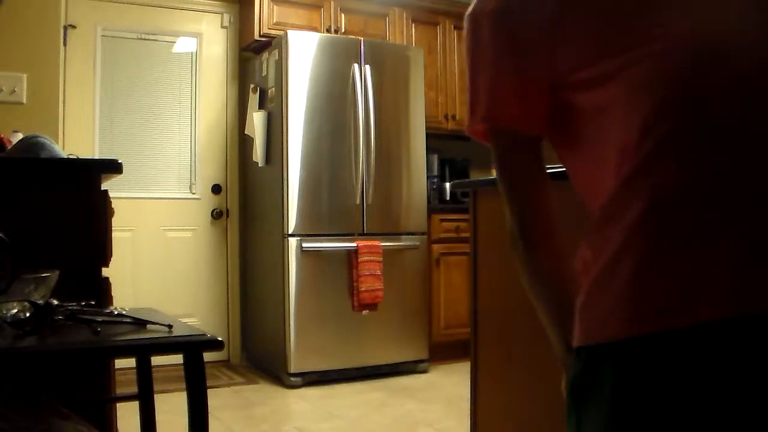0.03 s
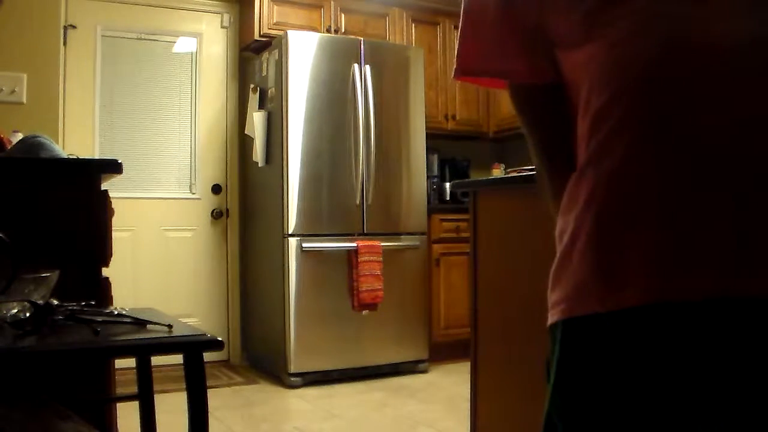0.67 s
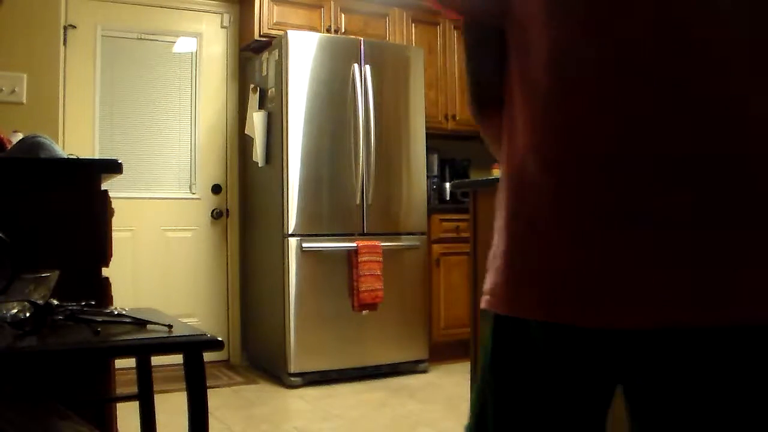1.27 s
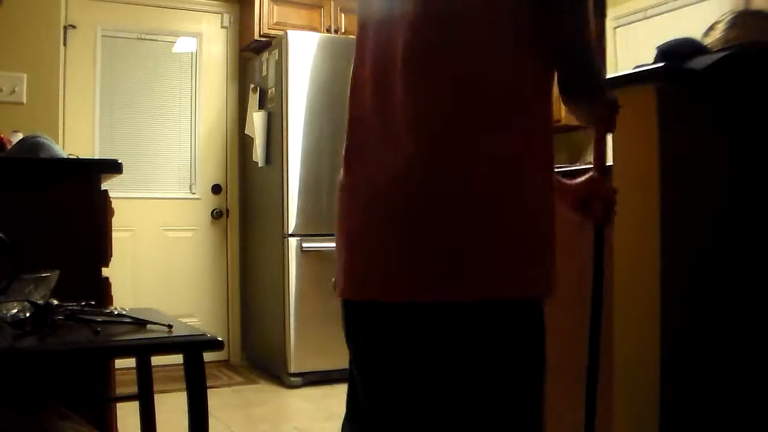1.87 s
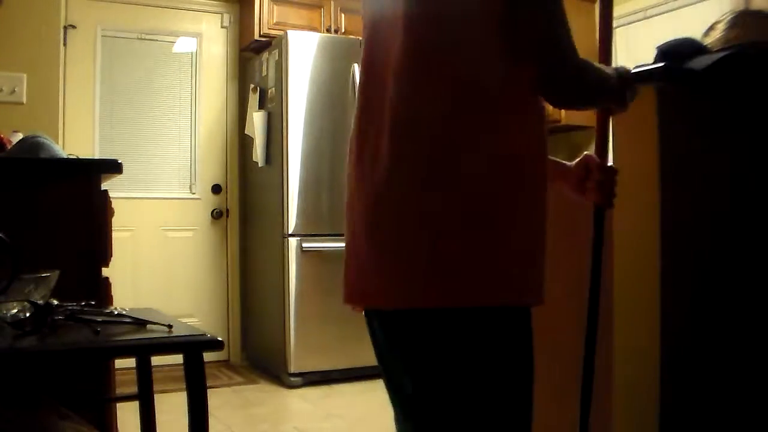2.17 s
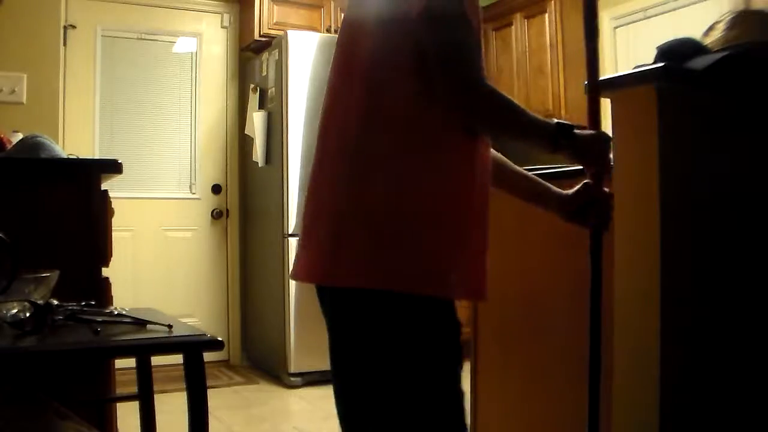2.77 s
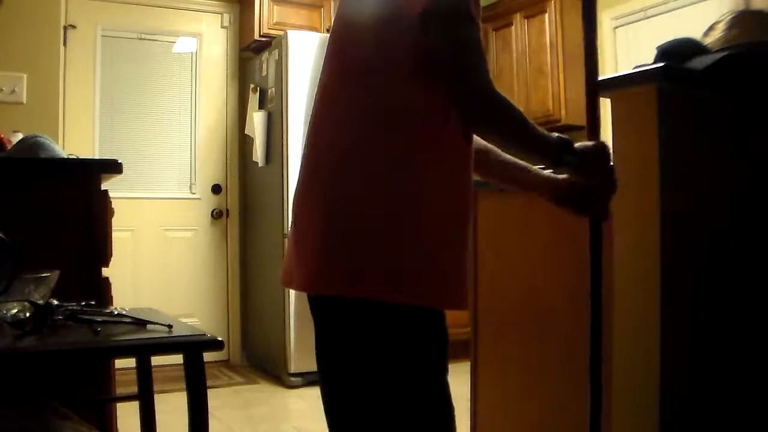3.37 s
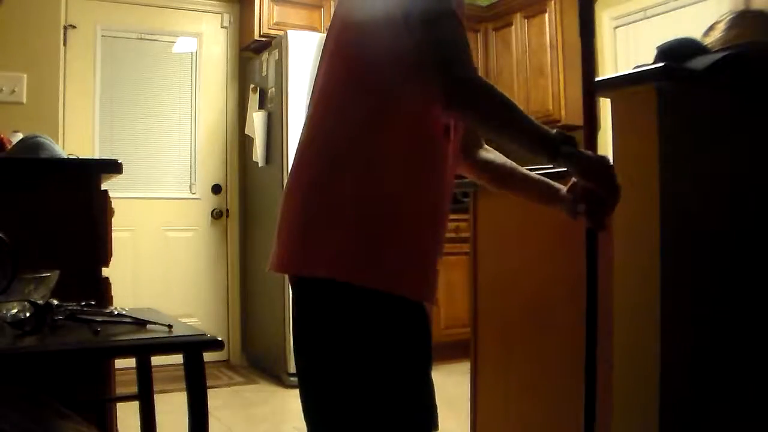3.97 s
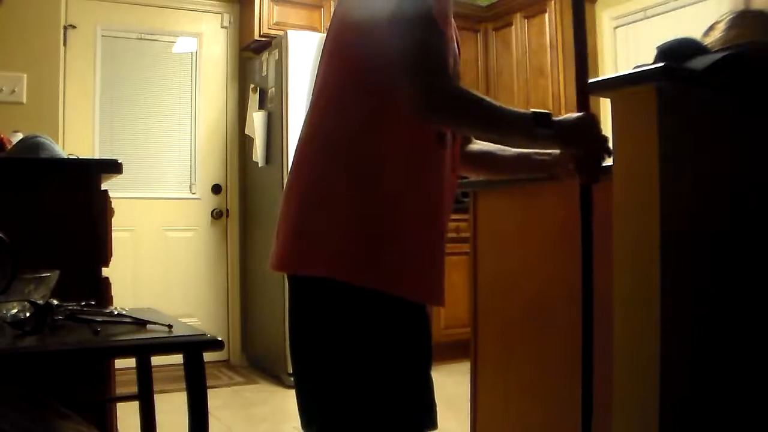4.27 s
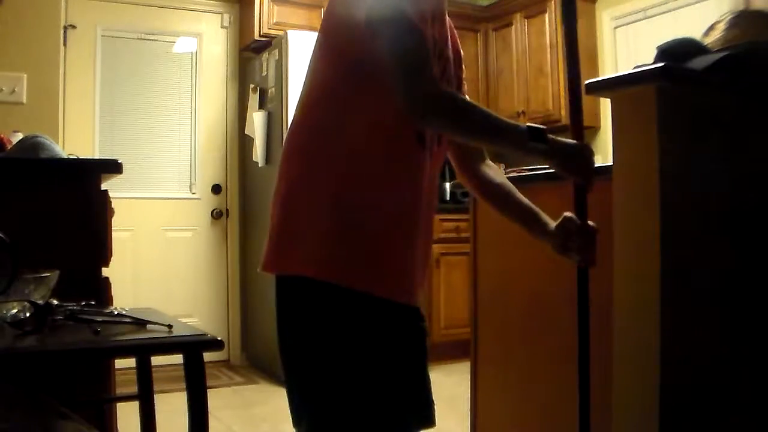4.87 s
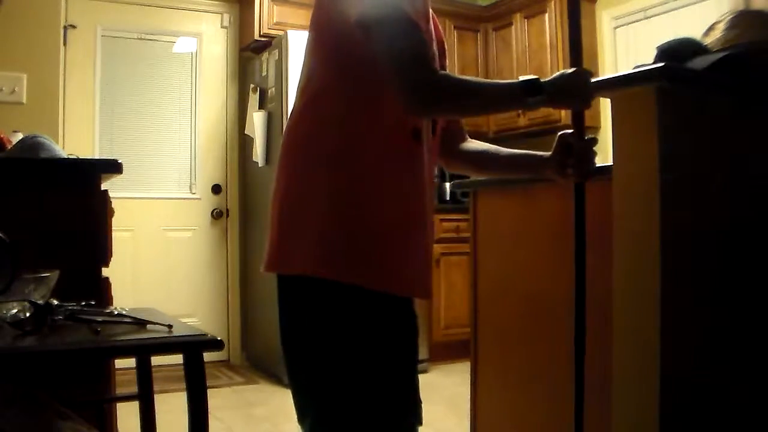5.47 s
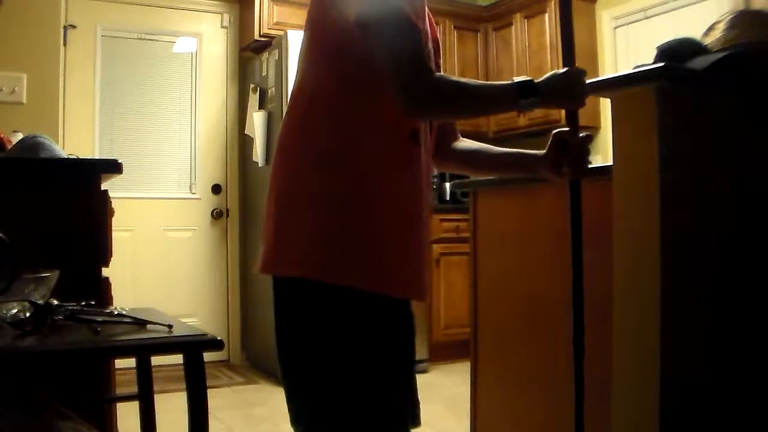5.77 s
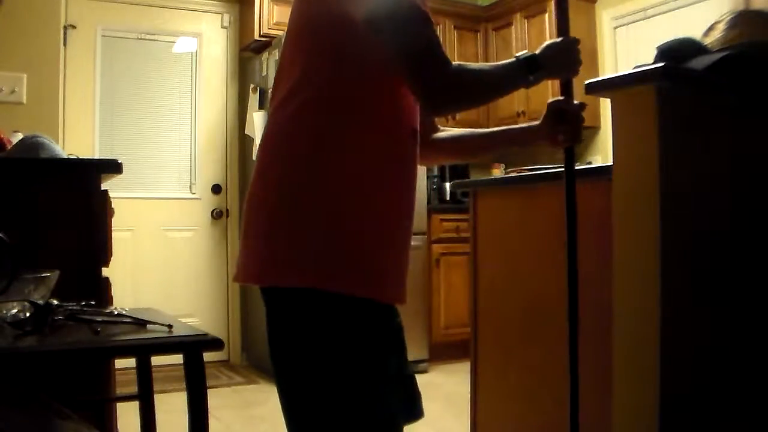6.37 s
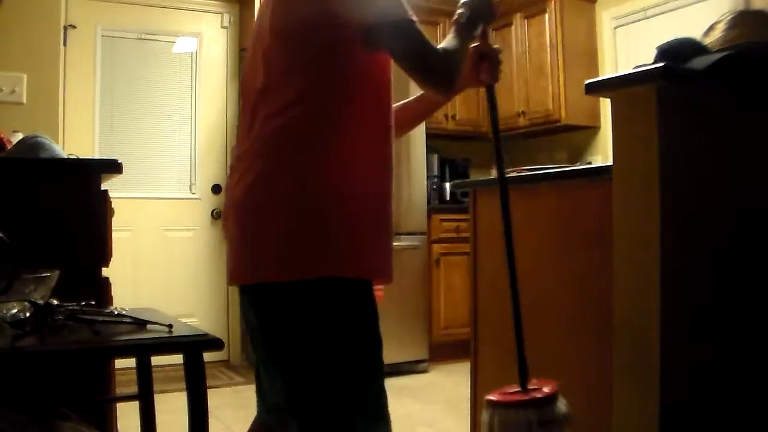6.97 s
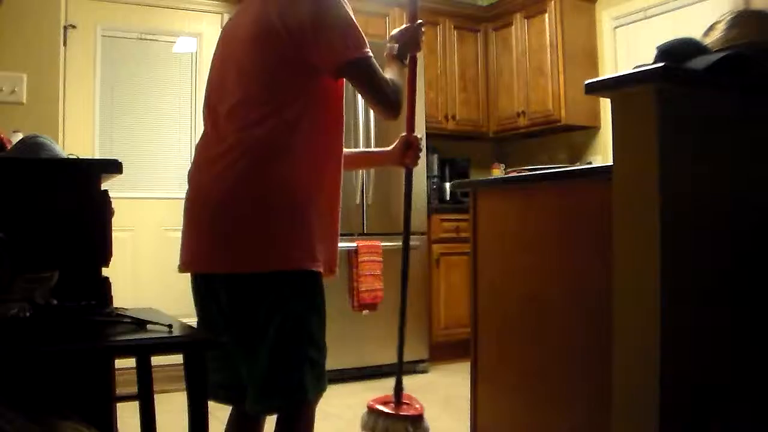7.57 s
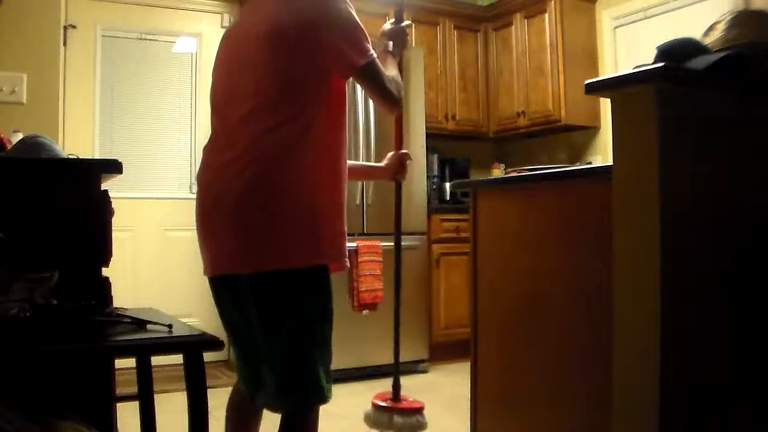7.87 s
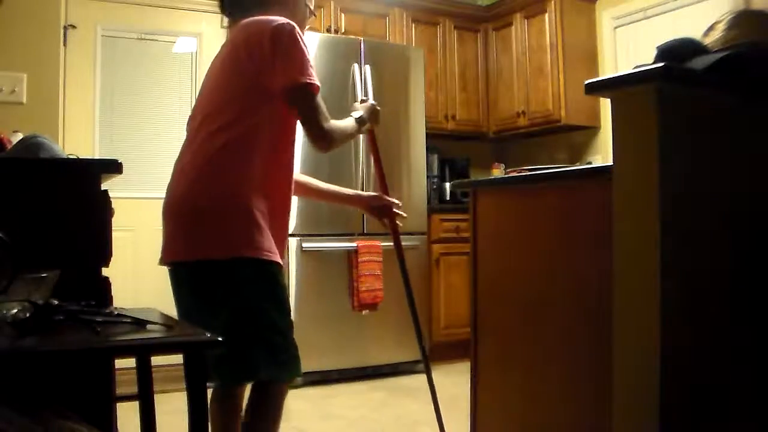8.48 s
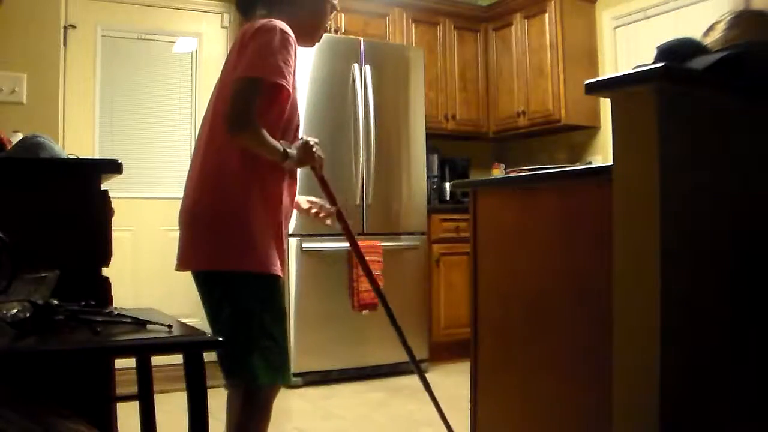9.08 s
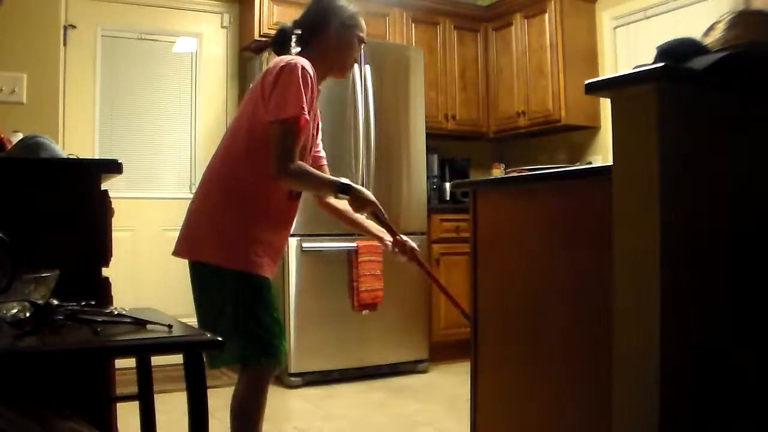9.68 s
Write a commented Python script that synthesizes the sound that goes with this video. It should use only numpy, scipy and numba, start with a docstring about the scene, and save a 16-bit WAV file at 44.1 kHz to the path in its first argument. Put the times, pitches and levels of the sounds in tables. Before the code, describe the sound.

A wet spin mop knocks, swishes and squelches in its bucket, then drains, drips and slaps onto the floor over a low ventilation hum.

```python
"""A live kitchen, with a spin mop worked in its bucket a few metres from a small camera's stereo microphone.
The plastic gear knocks at first. Wet strands swish as they drag and squelch as air pockets burst;
then the raised head drains in plinking bubbles, drips, and slaps onto the floor.
Ventilation hums behind it all, and the camera's gain control ducks after the hardest knock."""
import sys
import numpy as np
from scipy import signal
from scipy.fft import rfft, irfft
from scipy.io import wavfile
from numba import njit

SR = 44100
rng = np.random.default_rng(int(sys.argv[2]) if len(sys.argv) > 2 else 0)


def transcribe(u):
    """Save the signal u as a 16-bit wav file named by the first command-line argument.

    u: samples, shape (n,) or (channels, n), limited to [-1, 1]; the rate is SR.
    q: integer samples, one column per channel.
    """
    v = np.clip(np.atleast_2d(u).T, -1, 1)
    q = np.round(v * 32767).astype(np.int16)
    wavfile.write(sys.argv[1], SR, q)


N = 428652
TIME = np.arange(N) / SR

# Pushes of the mop, a few metres off: start_s, swell_s, relative_level_db, fade_s, spray_offset_db
MOP_STROKES = [(0.0, 0.0099, -43.5, 0.12, -12.5), (0.343, .004, -42.5, 0.027, -13),
               (1.57, 0.052, -59.5, 0.32, -13), (1.95, 0.049, -37, 0.18, -13.5),
               (2.285, 0.03, -43.5, 0.079, -32), (2.43, 0.035, -39, 0.068, -24),
               (2.475, 0.009, -37.5, 0.073, -8.5), (2.663, 0.0084, -45.5, 0.33, -17),
               (3.039, 0.11, -42, 0.18, -14), (3.44, 0.042, -45, 0.49, -17),
               (3.99, 0.099, -46, 0.45, -11.5), (4.221, 0.1, -34, 0.15, -18.5),
               (4.55, 0.065, -46.5, 0.051, -20), (5.0, 0.13, -47.5, 0.22, -40.5),
               (5.39, 0.11, -40, 0.03, -16), (6.93, .04, -50, .12, -5), (7.3, 0.21, -54.5, .15, -8),
               (8.12, 0.35, -51.5, 0.037, -3.5), (9.42, 0.039, -59, 0.089, -5), (9.63, .025, -50, .04, -26)]
def strokes(fade_power=1.1):
    """Rubbing and spray gains of the pushes: each swells, then dies away ever faster."""
    effort, mist = np.zeros(N), np.zeros(N)
    for start_s, swell_s, level_db, fade_s, spray_db in MOP_STROKES:
        age = TIME - start_s
        swell = np.sin(np.pi / 2 * np.clip(age / swell_s, 0, 1))
        shape = swell * np.exp(-(np.maximum(age - swell_s, 0) / fade_s) ** fade_power)
        effort = np.hypot(effort, undb(level_db) * shape)
        mist = np.hypot(mist, undb(level_db + spray_db) * shape)
    return effort, mist


# Spectrum of wet strands rubbing: frequency_hz, relative_level_db
STRAND_SPECTRUM = [(240, -37), (400, -1.5), (507, 1.5), (654, -10), (758, -6), (948, -2.5), (1070, -5.5),
                   (1460, -7.5), (3410, -5), (8320, -18), (10200, -19), (14000, -44)]
def swish(rub_db=-2, froth_db=-7, spray_db=-4, pressed_db=-48, bubbles=9000):
    """Wet strands drag in uneven slips; froth pops between them and throws a fine spray."""
    effort, mist = np.hypot(strokes(), seepage())
    slips = gurgle() * undb(4 * wander(70))
    rub = unit_rms(colour(slips, STRAND_SPECTRUM))
    froth, spray = np.zeros(N), np.zeros(N)
    for pop_at, pitch, chance, spray_at in rng.uniform(1e-3, 1, (bubbles, 4)):
        weight = min(-np.log(chance), 4.5)  # many faint, a few loud
        # small bubbles die sooner but snap harder
        pop = (1 + pitch) * bubble(1000 * 6 ** pitch, cycles=5, glide=.039)
        add(froth, pop_at * N / SR, undb(3 * weight) * pop)
        droplet = bubble(7000 + 6000 * pitch, cycles=3, glide=.005)
        add(spray, spray_at * N / SR, undb(5 * weight) * droplet)
    squeeze = np.minimum(effort / undb(pressed_db), 1)  # only a pressed head foams
    strands = undb(rub_db) * rub + squeeze * undb(froth_db) * unit_rms(froth)
    return effort * strands, mist * undb(spray_db) * unit_rms(spray)


def gurgle(flicker_db=5, flicker_per_s=45):
    """Noise in bands that well up and close on their own, like shifting pockets of water."""
    return sum(noise_band(hz, .35 * hz) * undb(flicker_db * wander(flicker_per_s))
               for hz in np.geomspace(300, 13000, 16))


# Air pockets bursting from the strands: start_s, relative_level_db, pitch_hz
AIR_POCKETS = [(1.925, -34, 3710), (2.0516, -27.5, 3270), (2.691, -28, 2680), (2.717, -26.5, 3660),
               (2.784, -34.5, 6770), (3.006, -31, 3090), (3.104, -28.5, 1460), (3.213, -33, 5120),
               (3.3352, -30.5, 2020), (3.3951, -26, 2360), (4.2315, -29.5, 3340), (4.5534, -37, 5040),
               (4.595, -32.5, 2680), (5.183, -29.5, 1564), (5.643, -29, 1097), (5.681, -36, 5200),
               (5.891, -33.5, 2210), (5.9936, -28.5, 2610), (6.0852, -30.5, 2840), (6.491, -33, 3240),
               (6.724, -32, 4700), (6.7545, -30, 3460)]
def squelches(gain_db=-3, puff_db=-9, puff_fade_s=.014, follower_db=-9, spread_s=.029, ring_s=.0057):
    """Each pocket bursts with one rising pop, a puff of froth and four smaller pops near its pitch."""
    out = np.zeros(N)
    for start_s, level_db, hz in AIR_POCKETS:
        add(out, start_s, undb(level_db) * bubble(hz, cycles=max(ring_s * hz, 1), glide=.035))
        puff = burst(noise_band(hz, .28 * hz, 2048), puff_fade_s)
        add(out, start_s, undb(level_db + puff_db) * puff)
        for lag, detune in rng.random((4, 2)):
            follower = bubble(hz * 2 ** (detune - .3), cycles=6.8, glide=.027)
            add(out, start_s + spread_s * lag, undb(level_db + follower_db) * follower)
    return undb(gain_db) * out


# Knocks of mop gear and feet: start_s, strength_db, brightness_hz
CONTACTS = [(0.0505, 4.5, 1360), (0.066, 0, 1640), (0.085, -12, 1480), (0.099, -3, 1690),
            (0.269, -9.5, 600), (0.359, -4.5, 1100), (0.463, -10, 710), (0.488, -7.5, 1190),
            (0.7414, 20, 10700), (1.058, -2.5, 596), (2.091, -5, 600), (3.319, -7.5, 700),
            (4.68, -9.5, 550), (5.14, -9, 600), (8.471, -13.5, 700)]
# Spectrum of the gear's hollow body: frequency_hz, relative_level_db
BODY_SPECTRUM = [(59, -73.5), (100, -50), (206, -10), (259, -3), (400, 0), (471, -3), (568, -7.5),
                 (759, -13.5), (933, -10.5), (1410, -16), (1730, -14), (2090, -16.5), (4880, -17),
                 (12100, -31), (14000, -52.5)]
# Ringing of the gear: pitch_hz, width_hz, gain_db
RING_MODES = [(328.3, 10, 13.5), (428, 22, 6), (556, 6, 10), (600, 8.1, 16.5), (1030, 50, -2.5),
              (1720, 8.1, 19), (1905, 11, 16), (2300, 5, 9), (2640, 3.3, 18), (2700, 5, 12)]
# Sharp crack of hard plastic: pitch_hz, width_hz, gain_db
SHELL_MODES = [(1700, 120, -1.5), (2980, 240, 11), (3550, 490, 9), (5600, 590, 5.5), (9370, 550, 6)]
def knocks():
    """Blows crack and ring the hollow plastic; softer ones push longer. Returns body and attack."""
    force, age = np.zeros(N), np.arange(1, 1024) / SR
    for start_s, strength_db, brightness_hz in CONTACTS:
        contact = age * np.exp(-2 * np.pi * brightness_hz * age)
        add(force, start_s, undb(strength_db) * contact / contact.sum())
    body = colour(force, BODY_SPECTRUM)
    ring = sum(undb(db) * resonate(body, hz, width) for hz, width, db in RING_MODES)
    # neighbouring modes of the shell start in opposite directions
    crack = sum((-1) ** k * undb(db) * resonate(force, hz, width)
                for k, (hz, width, db) in enumerate(SHELL_MODES))
    return undb(5) * body + undb(-7) * ring, undb(1) * crack + undb(-6) * ring


# Thuds of bucket and gear, then slaps and sloshes of the wet head:
# start_s, relative_level_db, centre_hz, fade_s
THUDS_AND_SLAPS = [(0.001, -34.5, 423, 0.32), (0.047, -26, 220, 0.042), (0.0505, -27, 1070, .03),
                   (0.361, -40.5, 216, 0.11), (0.485, -43, 2300, 0.0073), (1.988, -36.5, 2060, 0.062),
                   (2.1641, -24, 1240, 0.0034), (2.168, -35.5, 1090, 0.047), (2.682, -31.5, 2160, 0.0058),
                   (4.275, -31, 1240, 0.014), (4.28, -38, 517, .15), (6.549, -34.5, 2980, .0027),
                   (6.602, -33, 1700, 0.0031), (8.4433, -18.5, 7300, 0.00082)]
def thuds_and_slaps():
    """Each thud, slap or slosh is a broad burst of noise that dies away."""
    out = np.zeros(N)
    for start_s, level_db, hz, fade_s in THUDS_AND_SLAPS + floor_landing():
        add(out, start_s, undb(level_db) * burst(noise_band(hz, 1.26 * hz, 8192), fade_s))
    return out


def floor_landing(start_s=8.4482, spread_s=.023, tips_hz=9000, bulk_hz=740):
    """Strands land in bunches, ever heavier, lower and further apart. Rows like THUDS_AND_SLAPS."""
    return [(start_s + spread_s * k ** 2, -35 + 4.5 * k,
             tips_hz * (bulk_hz / tips_hz) ** k, .049 - .007 * k) for k in np.linspace(0, 1, 4)]


# Water running off the raised head into the bucket: time_s, bubbles_per_s
RUNOFF_RATE = [(5.3, 5.7), (5.55, 75), (6.05, 149), (6.35, 34), (6.7, 157), (6.93, 75), (7.03, 3)]
def runoff(time_s):
    """Bubbles per second as the water drains."""
    return np.interp(time_s, *np.transpose(RUNOFF_RATE), left=0, right=0)


def trickle(faintest_db=-43, low_hz=1220, octaves=2.534, tries=1800):
    """Falling threads of water trap bubbles that plink as they rise."""
    out = np.zeros(N)
    for when, chance, pitch, size in rng.uniform(1e-3, 1, (tries, 4)):
        start_s = when * N / SR
        if chance * tries < runoff(start_s) * N / SR:
            weight = min(-np.log(size), 3)
            ring = bubble(low_hz * 2 ** (octaves * pitch), cycles=7, glide=.0056)
            add(out, start_s, undb(faintest_db + 3 * weight) * ring)
    return out


def seepage(full_flow_per_s=123, drizzle_start_s=7.33, drizzle_length_s=.8):
    """Seeping and spray gains follow the runoff; a last drizzle falls as the head crosses the floor."""
    flow = (runoff(TIME) / full_flow_per_s) ** .31
    progress = np.clip((TIME - drizzle_start_s) / drizzle_length_s, 0, 1)
    drizzle = 2 * np.sqrt(progress * (1 - progress))
    return undb(-47) * flow, undb(-57.5) * flow + undb(-59) * drizzle


# Ticks of spray from the working mop, then drops off the lifted head:
# start_s, relative_level_db, pitch_hz
WATER_TICKS = [(2.102, -32.5, 10200), (2.401, -39, 10100), (5.547, -32, 8600), (6.2322, -35, 10500),
               (7.0673, -34, 6000), (7.0766, -30.5, 7500), (7.2464, -40, 12700), (7.258, -39.5, 7800),
               (7.293, -36.5, 10300), (7.7822, -39, 9800), (7.819, -34.5, 7340), (7.891, -34.5, 6030),
               (8.019, -40.5, 10300)]
def water_ticks(gain_db=1, splash_db=-12, splash_fade_s=.0038):
    """Flung or falling, a drop ticks where it lands and spatters."""
    out = np.zeros(N)
    for start_s, level_db, hz in WATER_TICKS:
        splash = burst(resonate(noise(512), hz, hz / 2), splash_fade_s)
        add(out, start_s, undb(level_db) * bubble(hz, cycles=4, glide=.0015))
        add(out, start_s, undb(level_db + splash_db) * splash)
    return undb(gain_db) * out


def plink(start_s=6.2865, gain_db=-31.5, pitch_hz=1787, ring_s=.017):
    """One large bubble at the surface in the bucket rings at an almost steady pitch."""
    out = np.zeros(N)
    add(out, start_s, undb(gain_db) * bubble(pitch_hz, cycles=ring_s * pitch_hz, glide=.0067))
    return out


# Ventilation hum in the room's resonances: pitch_hz, width_hz, relative_level_db
HUM_BANDS = [(30, 7.5, -55), (83.2, 12.5, -56.5), (129.5, 11, -65.5), (240.4, 3.8, -55.5),
             (270.5, 5.6, -62.5)]
# Rush of air all around the microphone: frequency_hz, relative_level_db
AIR_SPECTRUM = [(12, -28), (20, -7.5), (107, -4), (138, -4.5), (186, -9), (252, -2.5), (298, -5.5),
                (476, -11), (517, -14), (610, -15), (872, -21.5), (1320, -23.5), (2110, -27.5), (3100, -30),
                (14500, -40.5)]
def ventilation(air_db=-46.5):
    """Steady rush of air with a few low, wavering resonances."""
    def rush():
        hum = sum(undb(db) * unit_rms(noise_band(hz, width)) for hz, width, db in HUM_BANDS)
        return hum + undb(air_db) * unit_rms(colour(noise(), AIR_SPECTRUM))
    return widen(rush(), rush())


# Time the kitchen takes to fall by 60 dB: frequency_hz, reverb_s
KITCHEN_DECAY = [(100, 1.15), (350, 0.3735), (2000, 0.6658), (5000, 0.43), (11000, 0.42)]
def kitchen(x, samples=32768, onset_s=.00043):
    """Dense reflections from cabinets and floor, lingering longest in the bass."""
    age, hz = np.arange(samples) / SR, np.fft.rfftfreq(samples, 1 / SR)
    spectra = rfft(widen(noise(samples), noise(samples)))
    edges_hz = [0, *np.geomspace(150, SR / 2, 12)]
    tail = np.zeros((2, samples))
    for low, high in zip(edges_hz, edges_hz[1:]):
        band = irfft(spectra * ((hz >= low) & (hz < high)))
        reverb_s = curve_at(KITCHEN_DECAY, (low + high) / 2)
        tail += band * undb(-60 * age / reverb_s)
    tail *= np.clip(age / onset_s, 0, 1)
    return np.array([convolve(x, channel / np.linalg.norm(channel)) for channel in tail])


# Stereo width of the room at the microphone: frequency_hz, side_over_mid_db
STEREO_WIDTH = [(30, -11), (280, -23), (700, -14), (1400, -14), (2800, -7.5), (5500, -1), (13000, -1)]
def widen(mid, side):
    """Diffuse sound at two close microphone ports: alike in the bass, unlike in the treble."""
    hz = np.fft.rfftfreq(len(side), 1 / SR)
    side = irfft(rfft(side) * undb(curve_at(STEREO_WIDTH, hz)), len(side))
    return np.array([mid + side, mid - side])


def bubble(hz, cycles, glide):
    """A damped ring whose pitch rises as it dies; it falls to 1/e in about `cycles` periods."""
    age = np.arange(int(6 * cycles * SR / hz) + 2) * hz / SR / cycles
    return np.exp(-age) * np.sin(2 * np.pi * cycles * age * (1 + glide * age))


def burst(x, fade_s):
    """Scale to rms 1, then fade exponentially."""
    return unit_rms(x) * np.exp(-np.arange(len(x)) / SR / fade_s)


def noise(samples=N):
    """White noise."""
    return rng.standard_normal(samples)


def noise_band(hz, width_hz, samples=N):
    """Noise passed twice through one resonance."""
    return resonate(resonate(noise(samples), hz, width_hz), hz, width_hz)


def wander(rate_per_s):
    """Random drift with a spread near 1."""
    knots = noise(N // 50)
    return np.interp(TIME * rate_per_s, np.arange(len(knots)), knots)


def resonate(x, hz, width_hz):
    """One resonance, gain 1 at its centre."""
    hz = min(hz, .45 * SR)
    return signal.lfilter(*signal.iirpeak(hz, hz / min(width_hz, SR / 3), SR), x)


def colour(x, spectrum, size=8192):
    """Causal filter of unit energy with a given spectrum."""
    gain = undb(curve_at(spectrum, np.fft.rfftfreq(size, 1 / SR)))
    cepstrum = irfft(np.log(gain))
    cepstrum[1:size // 2] *= 2  # fold to minimum phase
    cepstrum[size // 2 + 1:] = 0
    response = irfft(np.exp(rfft(cepstrum)))
    return convolve(x, response / np.linalg.norm(response))


def convolve(x, response):
    """Play a sound through an impulse response."""
    return signal.fftconvolve(x, response)[:len(x)]


def curve_at(points, hz):
    """Read a table on a log-frequency axis."""
    knots_hz, values = np.transpose(points)
    return np.interp(np.log(hz + 1), np.log(knots_hz), values)


def add(track, start_s, sound):
    """Mix a sound into a track at a time."""
    i = max(int(start_s * SR), 0)
    track[i:i + len(sound)] += sound[:max(N - i, 0)]


def undb(db):
    """Decibels to gain."""
    return 10 ** (np.asarray(db) / 20)


def unit_rms(x):
    """Scale to rms 1."""
    return x / np.sqrt(np.mean(x ** 2))


def scene():
    """From a few metres off, the knocks' body arrives mostly by the walls, their crack mostly straight."""
    strands, spray = swish()
    body, crack = knocks()
    mop = strands + squelches() + trickle() + plink() + thuds_and_slaps()
    ticks = spray + water_ticks()
    direct = undb(-1) * mop + undb(2) * ticks + undb(-15.5) * body + crack
    room = kitchen(undb(-4) * mop + undb(4) * ticks + body + undb(-31) * crack)
    balance = undb([[-.25], [.25]])  # a touch to the right
    return (direct + room + ventilation()) * balance


@njit
def gain_control(level, threshold, attack_s, hold_s, release_s):
    """A peak over the threshold pulls the gain down; it is held, then let go."""
    out, gain, goal, wait_s = np.empty(len(level)), 1., 1., 0.
    for i in range(len(level)):
        wait_s -= 1 / SR
        if level[i] * goal > threshold:
            goal, wait_s = threshold / level[i], hold_s
        elif wait_s < 0:
            goal += (1 - goal) / (release_s * SR)
        gain += (goal - gain) * min(1., 1 / (attack_s * SR))
        out[i] = gain
    return out


def record(dry):
    """The camera ducks after a loud peak, rounds what slips through, hisses faintly and cuts the top."""
    ceiling, hiss_db, top_hz = .8, -69, 14300
    gain = gain_control(np.abs(dry).max(axis=0), threshold=.43, attack_s=.0001, hold_s=.52, release_s=.12)
    rounded = ceiling * np.tanh(dry * gain / ceiling)
    hiss = undb(hiss_db) * np.array([noise(), noise()])
    lowpass = signal.ellip(10, .2, 70, top_hz, fs=SR, output="sos")
    return signal.sosfilt(lowpass, rounded + hiss)


dry = scene()
out = record(dry)
transcribe(out)
```